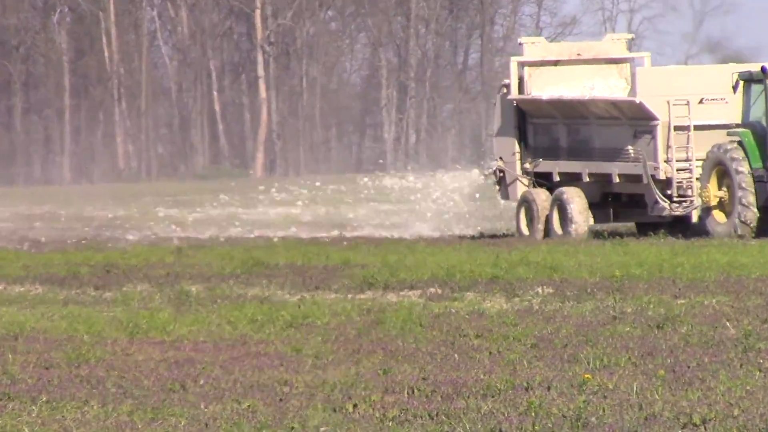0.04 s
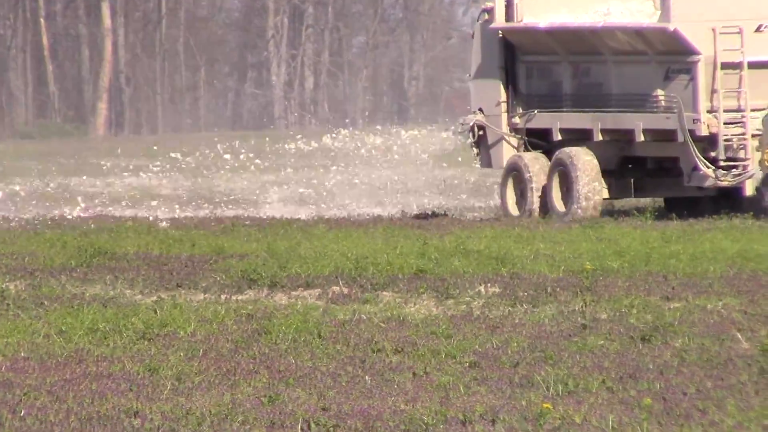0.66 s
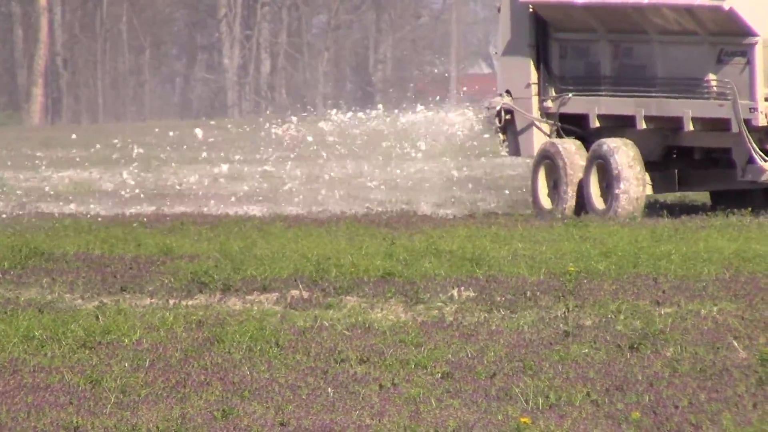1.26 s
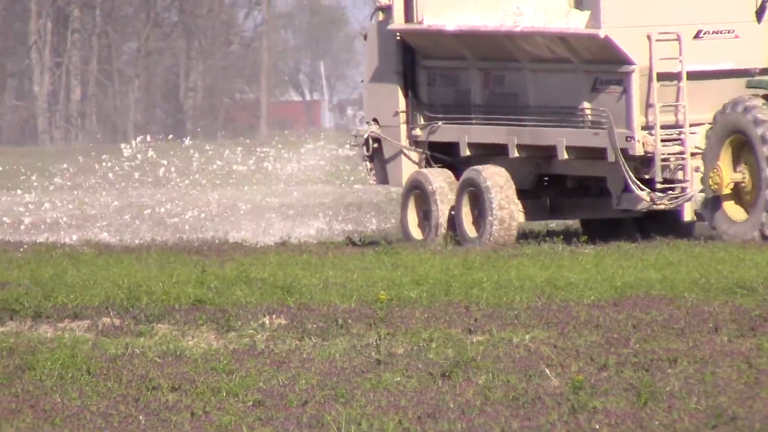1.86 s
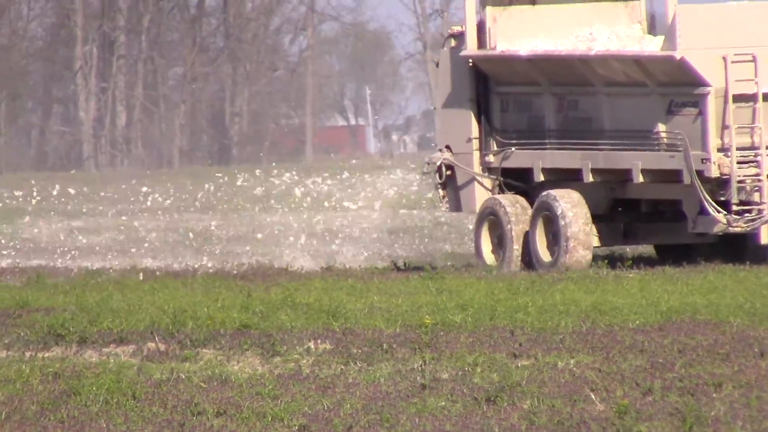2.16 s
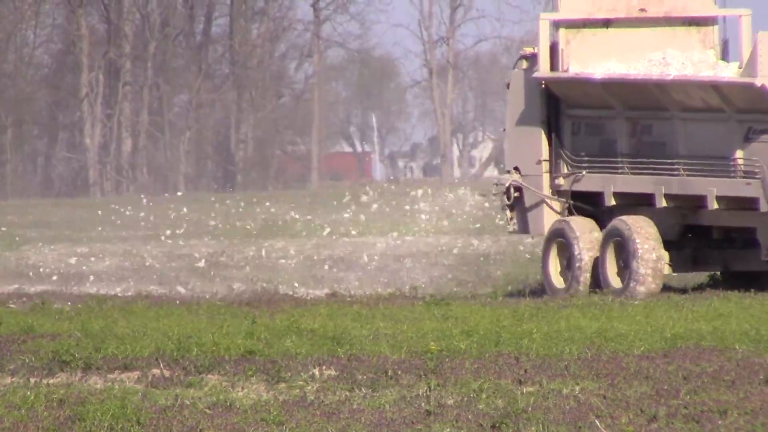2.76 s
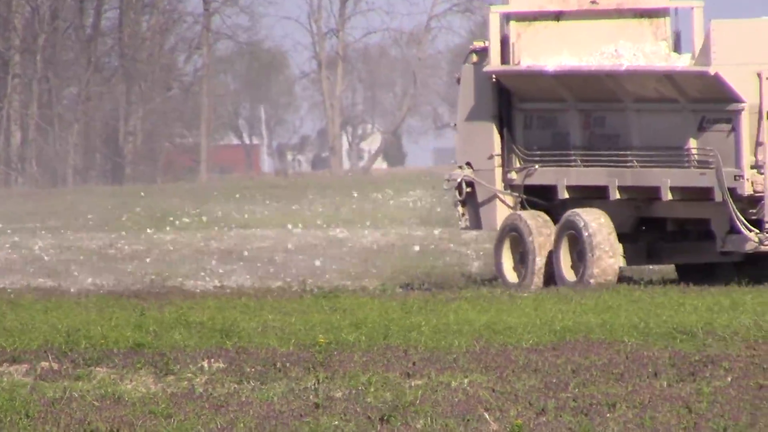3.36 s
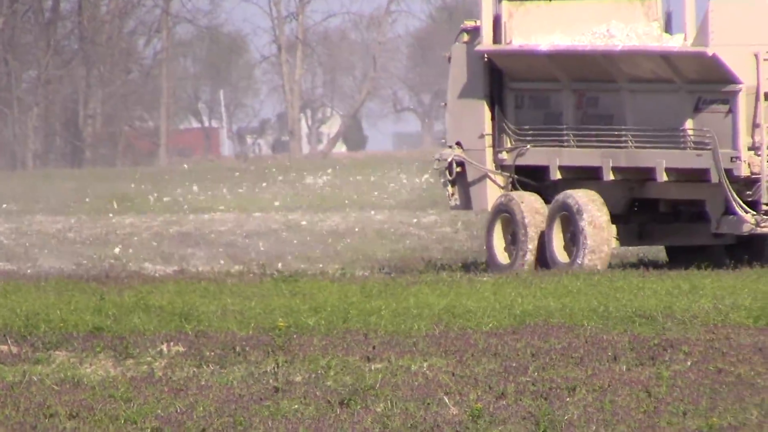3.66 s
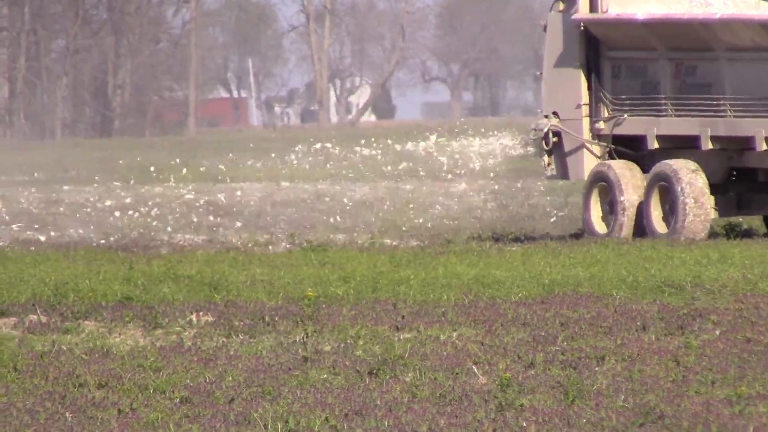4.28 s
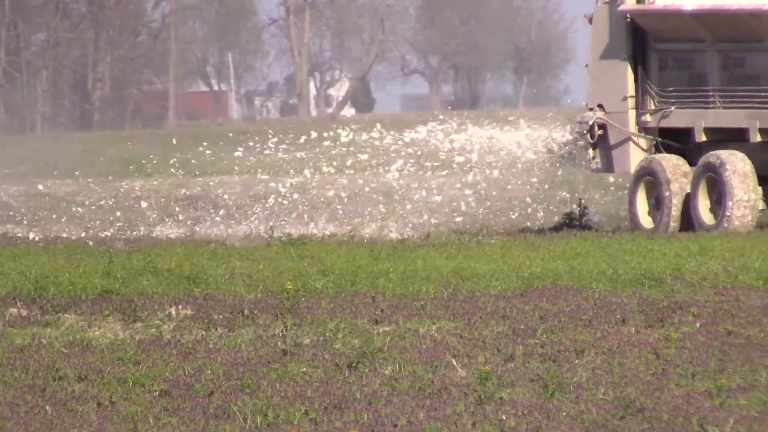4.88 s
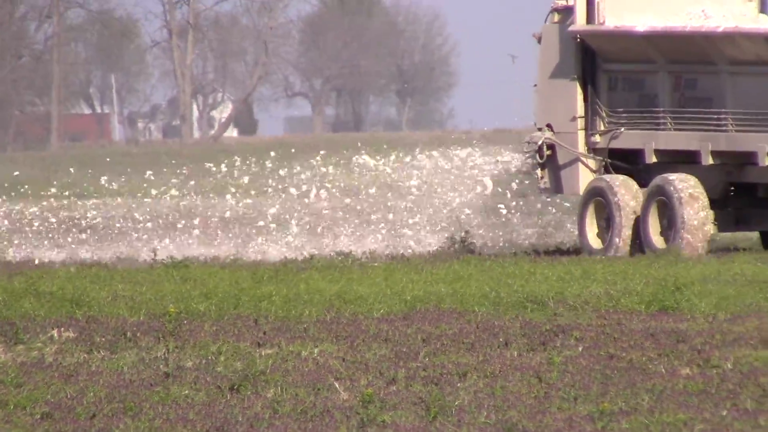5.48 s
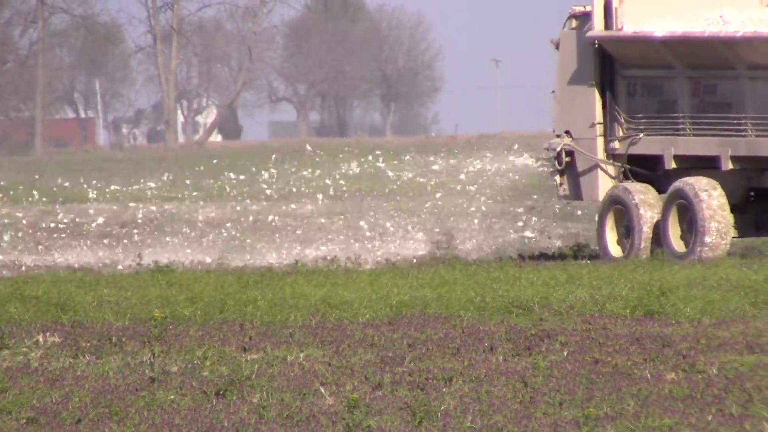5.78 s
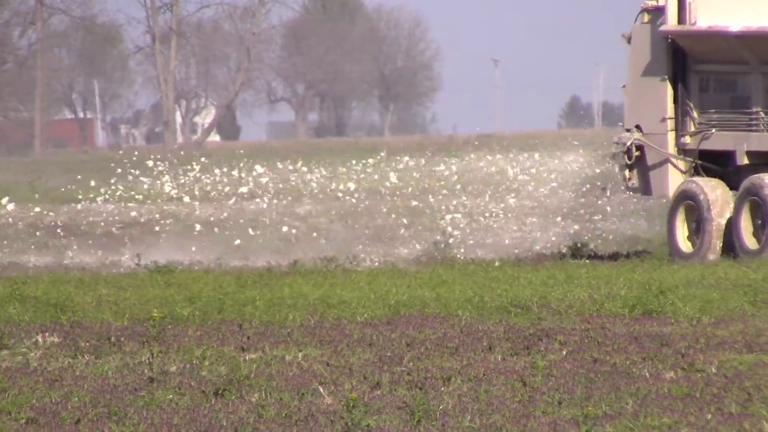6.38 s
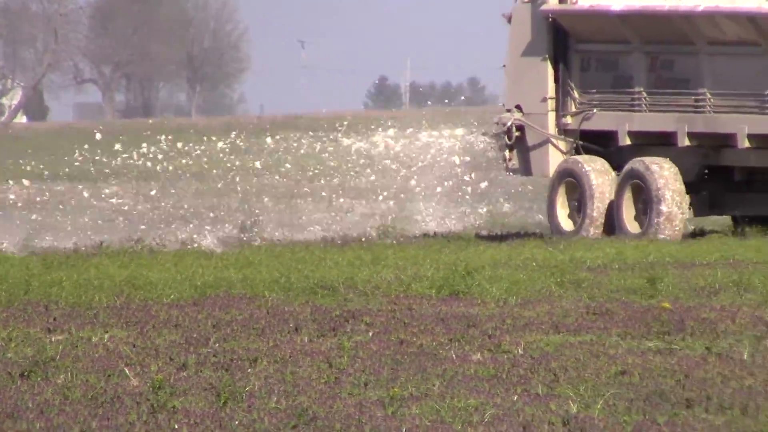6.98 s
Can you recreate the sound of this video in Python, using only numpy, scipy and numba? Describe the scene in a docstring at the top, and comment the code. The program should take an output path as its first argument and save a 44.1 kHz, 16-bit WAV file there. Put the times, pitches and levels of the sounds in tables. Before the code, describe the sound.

Gusty wind thumps against the microphone over the steady hum and rattle of a tractor pulling a working spreader across a field.

```python
"""Manure spreading in gusty wind

A six-cylinder diesel tractor pulls a working manure spreader across an open field, some way off.
Periodic firing makes the exhaust hum and the engine clatter; the beaters fling a hissing spray and clods.
Turbulent pressure buffets the two ports of a microphone; late on, its wind filter thins the bass
and narrows all but the high treble to mono."""
import sys
import numpy as np
from scipy import signal
from scipy.fft import rfft, irfft, next_fast_len
from scipy.io import wavfile
from scipy.ndimage import uniform_filter1d, minimum_filter1d, map_coordinates
from numba import njit

SR = 44100
rng = np.random.default_rng(int(sys.argv[2]) if len(sys.argv) > 2 else 0)


def store_wav(level_fs):
    """Save 16-bit WAV to argv[1]."""
    pcm = np.round(np.clip(np.atleast_2d(level_fs), -1, 1) * 32767)
    wavfile.write(sys.argv[1], SR, pcm.T.astype(np.int16))


N = 314874
T = np.arange(N) / SR
CLOSING_PER_S = .11  # relative rate at which echo lags shrink and clatter bands and notches rise


def undb(db):
    """Logarithmic level: 20 dB is a factor of ten in amplitude."""
    return 10 ** (np.asarray(db) / 20)


def curves(table):
    """Linear interpolation: each column after the time becomes a value per sample."""
    times, *columns = np.transpose(table)
    return [np.interp(T, times, column) for column in columns]


def unit(x):
    """Normalisation to an rms of 1."""
    return x / np.sqrt(np.mean(x ** 2))


def filtered(x, response):
    """Linear filtering: the spectrum is multiplied by a frequency response."""
    size = next_fast_len(x.shape[-1])
    hz = np.maximum(np.fft.rfftfreq(size, 1 / SR), 1)
    return irfft(rfft(x, size) * response(hz), size)[..., :x.shape[-1]]


def colour(x, spectrum):
    """Spectral shaping by (frequency [Hz], relative level [dB]) points, to an rms of 1."""
    hz, db = np.transpose(spectrum)
    return unit(filtered(x, lambda f: undb(np.interp(np.log(f), np.log(hz), db))))


def noise():
    """White noise: equal mean power per hertz."""
    return rng.standard_normal(N)


def wander(rate_hz, size=N):
    """Low-passed noise: a smooth random fluctuation with an rms of 1."""
    return unit(filtered(rng.standard_normal(size), lambda f: np.exp(-(f / rate_hz) ** 2)))


def spread(mid, side, side_db):
    """Mid-side stereo: the side signal adds on the left and subtracts on the right."""
    return mid + undb(side_db) * side * np.array([[1], [-1]])


def scattered_times(start, length, per_s):
    """Stratified sampling: one random moment in each of a row of equal slots."""
    slots = max(round(length * per_s), 1)
    return start + length * (np.arange(slots) + rng.random(200)[:slots]) / slots


@njit
def band_pass(x, hz, width_hz):
    """Second-order band-pass filter with a moving centre."""
    out, band_state, low_state = np.empty(len(x)), 0., 0.
    for i in range(len(x)):
        tuning, damping = np.tan(np.pi * hz[i] / SR), width_hz / hz[i]
        band = (band_state + tuning * (x[i] - low_state)) / (1 + tuning * (tuning + damping))
        band_state = 2 * band - band_state
        low_state += 2 * tuning * band
        out[i] = damping * band
    return out


def bursts(rows, octaves, decay_s):
    """Exponential decay of noise bands, one per (time [s], level [dB], centre [Hz]) row."""
    out = 0
    for s, db, hz in rows:
        band = unit(filtered(noise(), lambda f: np.exp(-(np.log2(f / hz) / octaves) ** 2 / 2)))
        out = out + band * undb(db) * (T >= s) * np.exp(-np.abs(T - s) / decay_s)
    return out


def turbulence(hz, corner_hz, slope=3.14, low_hz=125, top_hz=2100):
    """Power-law spectrum: eddy pressure falls above a corner, and the microphone rolls off the bass."""
    eddy_loss = (1 + (hz / corner_hz) ** (2 * slope)) * (1 + (hz / top_hz) ** 8)
    bass_loss = 1 + (low_hz / hz) ** 4.06
    return 1 / np.sqrt(eddy_loss * bass_loss)


# Breeze between the gusts: (time [s], relative level [dB])
BREEZE_LEVEL = [(0, -38.5), (0.95, -37), (1.1, -54), (1.4, -79), (2.3, -90), (3.0, -66), (3.45, -39.5),
                (3.7, -58.5), (4.15, -36), (4.65, -46), (5.35, -35.5), (5.85, -53), (7.14, -54.5)]
def breeze(corner_hz=203, flutter_db=3):
    """Weak turbulence: light air keeps the pressure fluttering at the ports."""
    eddies = spread(noise(), noise(), side_db=-6) * undb(flutter_db * wander(34))
    pressure = unit(filtered(eddies, lambda f: turbulence(f, corner_hz, slope=3.22)))
    return pressure * undb(curves(BREEZE_LEVEL)[0] + 6)


def puffs(per_s=6.4, length_s=.005, corner_hz=269, scatter_db=2.5, bias_db=11):
    """Advection: small eddies ride on the breeze and strike either port; gives rows for buffets()."""
    times = scattered_times(0, T[-1], per_s)
    levels_db = np.interp(times, *np.transpose(BREEZE_LEVEL)) + 6
    return [(s, length_s, db + scatter_db * strength, corner_hz, bias_db * np.sign(port))
            for s, db, (strength, port) in zip(times, levels_db, rng.standard_normal((200, 2)))]


# Strong gusts: (time [s], length [s], level [dB], turbulence corner [Hz], nominal left bias [dB])
WIND_GUSTS = [(0.088, 0.024, -25.5, 242, -14), (0.242, 0.012, -21, 254, 15),
              (0.581, 0.027, -16.5, 326, -9.5), (0.8, 0.037, -24, 312, 14), (0.902, 0.044, -29, 380, 13),
              (1.205, 0.085, -33.5, 261, -9), (1.27, 0.025, -28.5, 400, 6), (1.518, 0.041, -44.5, 215, -4),
              (2.541, 0.03, -31, 296, 5), (2.573, 0.039, -26.5, 263, 5), (2.675, 0.023, -39.5, 237, -8),
              (3.02, 0.035, -41.5, 255, 5), (3.199, 0.0081, -29, 235, 8), (3.376, 0.026, -27, 274, -9),
              (3.441, 0.037, -26, 267, -7.5), (3.486, 0.012, -20.5, 308, 19),
              (3.816, 0.012, -21, 280, -10.5), (4.124, 0.064, -19, 305, 9.5),
              (4.216, 0.011, -16.5, 337, -11), (4.285, 0.014, -23.5, 340, 16.5),
              (4.44, 0.064, -29.5, 250, 10), (4.55, 0.022, -19, 273, -9), (4.731, 0.013, -25.5, 271, -12.5),
              (4.816, 0.03, -20, 274, -10), (4.921, 0.087, -10.5, 469, 10.5),
              (5.087, 0.017, -31.5, 236, -7), (5.152, 0.11, -8, 473, 10.5), (5.302, 0.035, -15, 398, 12.5),
              (5.468, 0.022, -6.5, 456, 7), (5.511, 0.059, -7.5, 524, 10), (5.661, 0.012, -29, 330, 10),
              (5.925, 0.026, -20.5, 420, 13.5), (5.943, 0.082, -24.5, 454, 12.5),
              (6.191, 0.014, -31, 473, 8.5), (6.234, 0.01, -34.5, 364, -6), (6.459, 0.043, -31, 385, -12),
              (7.056, 0.009, -39, 382.5, -10)]
def buffets(gusts, rise_s=.0037, fall_s=.013, sag_s=.085, flap_db=1.7, lee_hz=470, size=16384):
    """Wind shadowing: a gust hits one port first; the port in its lee receives it later and duller."""
    out = np.zeros((2, N + 2 * size))
    lead = size // 8
    t = (np.arange(size) - lead) / SR
    for s, length, db, corner_hz, bias_db in gusts:
        envelope = np.exp(np.minimum(t, 0) / rise_s - np.maximum(t - length, 0) / fall_s)
        sag_db = 4 * (np.clip(t, 0, length) / sag_s) ** 2
        envelope *= undb(flap_db * wander(55, size) - sag_db)
        shared, *own = rng.standard_normal((3, size)) * envelope
        windward = shared + .22 * own[0]
        lee = filtered(shared + .22 * own[1], lambda f: (1 + 1j * f / lee_hz) ** (-abs(bias_db) / 5))
        ports = np.array([windward, lee])
        spurts = unit(undb(6 * wander(130, size)))  # the smallest eddies are intermittent
        large_eddies = filtered(ports, lambda f: 1 / (1 + (f / 600) ** 4))
        eddies = large_eddies + spurts * (ports - large_eddies)
        low_hz = max(.35 * corner_hz, 125)  # faster air, less boom
        pressure = unit(filtered(eddies, lambda f: turbulence(f, corner_hz, low_hz=low_hz)))
        pressure *= np.sqrt(np.mean(envelope ** 2)) * undb(db)
        start = int(s * SR)
        out[:, start:start + size] += pressure if bias_db >= 0 else pressure[::-1]
    return out[:, lead:lead + N]


def cracks(per_s=60, hz=700, scatter_db=4, bias_db=6.5):
    """Pressure steps snap at the windward port, harder in stronger gusts; gives rows for pops()."""
    rows = []
    for gust_s, length, gust_db, _, side in WIND_GUSTS:
        span = .7 * length
        times = scattered_times(gust_s, span, per_s)[:round(span * per_s)]
        for s, chance in zip(times, rng.standard_normal(20)):
            rows.append((s, 1.8 * gust_db - 1 + scatter_db * chance, hz, bias_db * np.sign(side)))
    return rows


# The hardest single eddies: (time [s], peak level [dB], pitch [Hz], left minus right [dB])
EDDY_POPS = [(0.25, -9, 266, 15), (0.59, -16.5, 356, 6), (0.647, -16, 245, 18), (0.827, -12, 269.5, 12),
             (0.909, -23, 480, 9), (0.925, -10, 330, 8), (0.94, -14.5, 420, 12), (1.274, -20, 416, 1.5),
             (3.44, -18, 253, 17), (3.489, -20, 323, 0), (3.789, -6, 252, 11), (4.129, -14.5, 267.4, -13),
             (4.179, -10, 306, 12), (4.22, -15.5, 406, -11), (4.293, -16.5, 292, 1.5),
             (4.559, -19.5, 324, 1), (4.83, -15.5, 326, -12), (4.941, -8, 910, 23),
             (4.966, -4.5, 657, 23.5), (5.151, -1.5, 407, 19), (5.164, -1, 890, 20),
             (5.177, -5.5, 798, 15.5), (5.202, -6, 540, 12), (5.223, -9, 780, 22), (5.236, -6, 760, 20),
             (5.305, -5, 406, 8), (5.476, -5, 684, 15), (5.511, 0, 960, 25), (5.544, 4.5, 776, 23),
             (5.737, -17.5, 327, 7.5), (5.922, -17, 410, -4), (5.949, -22.5, 646, 0), (5.987, -34, 473, 13),
             (6.196, -25, 534, 1), (6.3, -22, 287, -5), (6.443, -30, 450, -12), (6.845, -38.5, 418.7, -1)]
def pops(rows, octaves=.726, top_hz=1550, size=2048):
    """Impulse response: a sudden pressure step at the ports gives one short band-limited pop."""
    out = np.zeros((2, N + size))
    for s, db, hz, bias_db in rows:
        edges_hz = np.minimum(hz * 2 ** (octaves * np.array([-1, 1])), top_hz)
        pop_filter = signal.butter(4, edges_hz, "band", fs=SR, output="sos")
        pop = signal.sosfilt(pop_filter, signal.unit_impulse(size))
        ports_db = db + np.minimum([bias_db, -bias_db], 0)
        start = max(int(s * SR) - np.abs(pop).argmax(), 0)
        out[:, start:start + size] += np.outer(undb(ports_db), pop / np.abs(pop).max())
    return out[:, :N]


def overload(wind, full_travel=1.1, low_hz=55, muffle_hz=2700):
    """Saturation: strong eddies drive the capsules to the end of their travel, rounding the peaks."""
    rounded = full_travel * np.tanh(wind / full_travel)
    return filtered(rounded, lambda f: 1 / np.sqrt((1 + (f / muffle_hz) ** 8) * (1 + (low_hz / f) ** 4)))


# Small ticks close by: (time [s], level [dB], pitch [Hz])
NEAR_TICKS = [(3.062, -42.5, 5400), (3.066, -36, 2300), (6.67, -45, 8800)]
def ticks():
    """Transients: noise that decays within milliseconds is heard as a sharp tick."""
    return bursts(NEAR_TICKS, octaves=.42, decay_s=.0016)


# High whine of the drive line: (time [s], level [dB])
WHINE_LEVEL = [(0, -78), (.5, -83), (1.3, -86), (2.0, -80), (2.45, -73), (3.0, -92), (4.1, -78), (5.0, -76),
               (5.7, -77.5), (7.14, -80)]
def whine(hz, db):
    """Amplitude and frequency modulation: a thin drive-line tone swells, fades and wavers."""
    return undb(db + 2 * wander(4)) * np.sin(2 * np.pi * np.cumsum(hz + 3 * wander(10)) / SR)


# Clods knocked off the beaters: (time [s], level [dB])
CLOD_HITS = [(1.451, -48), (1.612, -47), (1.639, -48), (1.771, -47), (1.94, -46)]
# Modes of the struck steel: (frequency [Hz], relative level [dB])
STEEL_MODES = [(925, -8), (1060, 1.5), (1300, -5)]
def clods():
    """Impact excitation: each clod smacks against steel, whose modes ring briefly."""
    smack = bursts([(s, db, 1400) for s, db in CLOD_HITS], octaves=.81, decay_s=.02)
    modes = [(s, db + mode_db - 8, hz) for s, db in CLOD_HITS for hz, mode_db in STEEL_MODES]
    return smack + bursts(modes, octaves=.03, decay_s=.032)


# Spectrum of the spray: (frequency [Hz], relative level [dB])
SPRAY_SPECTRUM = [(1500, -11), (4000, 9.5), (5600, 7), (6800, 3), (8500, 0), (11500, -4), (15500, -9.5)]
# Hiss of the spray: (time [s], relative level [dB])
SPRAY_LEVEL = [(0, -69.5), (.27, -72), (.36, -76), (1.3, -78.5), (1.65, -73), (2.58, -73), (2.7, -75),
               (2.95, -73), (7.14, -71.5)]
def spray():
    """Broadband noise: the spray off the beaters hisses, partly coherent between the ports."""
    hiss = spread(colour(noise(), SPRAY_SPECTRUM), colour(noise(), SPRAY_SPECTRUM), side_db=-12.5)
    return hiss * undb(curves(SPRAY_LEVEL)[0] + 6.5)


# Spectrum of the spreader's body: (frequency [Hz], relative level [dB])
BODY_SPECTRUM = [(25, 1), (300, 3.5), (600, 3), (800, -1), (1000, 2.5), (1400, -2), (1900, -2), (2400, -4),
                 (3500, -24.5), (8000, -56.5)]
# Roar of the body: (time [s], relative level [dB])
BODY_LEVEL = [(0, -44), (.2, -49.5), (.85, -61.5), (1.9, -52.5), (2.65, -53.5), (2.9, -50.5), (5.7, -48.5),
              (6.5, -54), (7.14, -53.5)]
def body_roar(envelope, gain_db):
    """Random vibration: the spreader's body roars over a broad band."""
    return colour(noise() * envelope, BODY_SPECTRUM) * undb(curves(BODY_LEVEL)[0] + gain_db)


# Reflections off the rig's steel panels: (initial lag [s], relative gain [1])
PANEL_PATHS = [(.0016, .28), (.0025, .34), (.0037, .34), (.0056, .3), (.009, .26)]
def panel_echoes(x):
    """Comb filtering: close echoes come and go as the panels turn, and their ridges creep upward."""
    out = x
    for lag_s, gain in PANEL_PATHS:
        lag = lag_s * np.exp(-CLOSING_PER_S * T + .015 * wander(1.5))
        echo = map_coordinates(x, [(T - lag) * SR], order=2)
        out = out + gain * np.tanh(2 * wander(1.1)) * echo
    return out / np.sqrt(1 + sum(gain ** 2 for _, gain in PANEL_PATHS) / 2)


def restless_air(x, depth_db=1, fades_per_s=7, bands=14):
    """Scintillation: moving air over the field makes bands swell and fade independently."""
    centres_hz, out = np.linspace(600, 6000, bands), 0
    knots_s = np.arange(0, T[-1] + 1, 1 / fades_per_s)
    for weights, fades in zip(np.eye(bands), rng.standard_normal((bands, 400))):
        band = filtered(x, lambda f: np.interp(f, centres_hz, weights))
        out = out + band * undb(depth_db * np.interp(T, knots_s, fades[:len(knots_s)]))
    return out


# Bands cancelled by the ground echo: (time [s], half length [s], centre [Hz], width [Hz], depth [0-1])
GROUND_NOTCHES = [(0.353, 0.3, 3150, 460, 0.7), (2.277, 0.15, 3300, 350, 1), (2.747, 0.069, 2750, 500, 0.1),
                  (4.455, 0.3, 3310, 380, 0.3), (4.505, .35, 2040, 296, 0.4), (6.101, 0.79, 2110, 377, .55),
                  (6.502, .18, 3150, 380, 0.45)]
def ground_echo(x):
    """Destructive interference: the ground echo cuts passing notches that rise as the rig moves."""
    out = x.copy()
    for s, half_s, hz, width_hz, depth in GROUND_NOTCHES:
        near = np.abs(T - s) < 3 * half_s
        t = T[near] - s
        band = band_pass(x[near], hz * np.exp(CLOSING_PER_S * t), float(width_hz))
        out[near] -= depth * np.exp(-(t / half_s) ** 2 / 2) * band
    return out


# Narrow bands of the clatter: (time [s], half length [s], centre [Hz], relative level [dB])
CLATTER_BANDS = [(.08, 0.13, 2750, -55.5), (.194, 0.31, 1890, -54), (.25, 0.14, 3970, -65),
                 (.81, .08, 2790, -57), (.847, 0.2, 2245, -57.5), (1.25, 0.22, 2440, -60),
                 (1.83, .1, 3320, -61), (1.873, .15, 2600, -57.5), (2.181, 0.061, 2730, -59.5),
                 (2.08, .1, 4076, -61.5), (2.454, .095, 3550, -61), (2.52, .17, 2370, -59),
                 (2.852, 0.15, 1047, -59.5), (3.0, .12, 2190, -64), (3.2, .15, 4880, -73),
                 (3.38, .1, 3930, -71), (3.4, 0.13, 2620, -59.5), (3.79, 0.2, 1830, -58.5),
                 (4.27, 0.13, 2500, -68), (4.277, .1, 3650, -60.5), (4.658, 0.1, 2580, -56),
                 (4.68, 0.082, 3710, -68), (5.03, 0.085, 2820, -53.5), (5.385, 0.069, 2710, -48),
                 (5.39, 0.085, 4100, -57.5), (5.72, 0.23, 2990, -56.5), (5.72, 0.13, 5100, -72),
                 (5.866, 0.11, 3300, -54.5), (6.098, 0.22, 2391, -56.5), (6.112, 0.066, 3980, -61),
                 (6.144, .08, 3360, -58.5), (6.462, 0.15, 3890, -57), (6.6, .15, 5050, -65),
                 (6.85, 0.32, 2505, -50), (6.85, 0.3, 4470, -57), (6.98, .12, 4930, -59.5)]
def clatter_bands(knock, relative_width=.066):
    """Band-pass filtering: narrow bands of the clatter swell, waver, creep upward and fade."""
    out, drive = np.zeros(N), noise() * knock
    waver = .012 * wander(16)
    for s, half_s, hz, db in CLATTER_BANDS:
        width_hz = relative_width * hz
        near = np.abs(T - s) < 2.5 * half_s
        t = T[near] - s
        centre_hz = hz * np.exp(CLOSING_PER_S * t + waver[near])
        band = band_pass(band_pass(drive[near], centre_hz, width_hz), centre_hz, 2 * width_hz)
        out[near] += unit(band) * np.exp(-(t / half_s) ** 2 / 2) * undb(db + 1.5)
    return out


# Engine speed, sagging and recovering under the beaters' load: (time [s], firing rate [Hz])
FIRING_RATE = [(0, 98.1), (.4, 98.4), (1.2, 96), (2.6, 96.97), (2.9, 99.86), (3.85, 98.43), (4.4, 97.8),
               (4.68, 97.85), (4.9, 95.1), (5.55, 95), (6.15, 95.35), (6.48, 99.14), (6.72, 97.1),
               (7.14, 97.3)]
def firing_count():
    """Phase is the integral of frequency: the number of firings so far."""
    return np.cumsum(curves(FIRING_RATE)[0]) / SR


def firing_pulses(firings, decay_periods, cylinder_db, scatter_db=1.8):
    """Cyclic variation: each firing gives a pulse; the six cylinders differ and no two turns are alike."""
    index = firings.astype(int)
    pulse_db = np.take(cylinder_db, index, mode="wrap") + scatter_db * rng.standard_normal(1000)[index]
    return unit(undb(pulse_db) * np.exp(-(firings % 1) / decay_periods))


# Blurring of the knocks: (time [s], steady part relative to the pulses' rms [1])
KNOCK_BLUR = [(0, 0.42), (6.3, 0.4), (6.7, 0.15)]
def knock_envelope(firings):
    """Screening: the spreader hides the engine and blurs its knocks, here at constant power."""
    pulses = firing_pulses(firings, decay_periods=.45, cylinder_db=[7.5, 4, 6, 3, 2.5, 4.6])
    blurred = pulses + curves(KNOCK_BLUR)[0]
    return blurred / np.sqrt(uniform_filter1d(blurred ** 2, SR // 8))


# Spectrum of the diesel clatter: (frequency [Hz], relative level [dB])
CLATTER_SPECTRUM = [(900, -17), (1600, -3), (2000, -4), (2400, -2), (2800, -1), (3150, -3), (3800, -12),
                    (5000, -19), (7000, -41.5), (14000, -50)]
# Spectrum of its sharp edge: (frequency [Hz], relative level [dB])
EDGE_SPECTRUM = [(2000, -36), (3100, -5.5), (3600, 0), (4200, -4), (4900, -13.5), (6000, -15.5),
                 (8000, -24.5), (14000, -52.5)]
# Diesel knock: (time [s], relative clatter level [dB], relative edge level [dB])
KNOCK_LEVELS = [(0.0, -51.5, -73), (0.27, -51.5, -65), (0.4, -52, -64), (1.2, -56, -67), (1.9, -51, -59),
                (2.55, -51.5, -59.5), (2.72, -54, -64), (3.55, -53, -54), (3.9, -53.5, -61.5),
                (4.8, -56.5, -58.5), (5.4, -51.5, -54.5), (6.3, -49.5, -54.5), (6.8, -48.5, -51),
                (7.14, -49, -54)]
def machinery(knock, air_hz=7000):
    """Multipath propagation: engine clatter and the spreader's roar arrive both direct and scattered."""
    clatter_db, edge_db = curves(KNOCK_LEVELS)
    clatter = colour(noise() * knock, CLATTER_SPECTRUM) * undb(clatter_db - 1.5)
    edge = colour(noise() * knock, EDGE_SPECTRUM) * undb(edge_db - 4)
    radiated = clatter + edge + body_roar(1 + .21 * knock, gain_db=.5)
    direct = ground_echo(restless_air(panel_echoes(radiated))) + clatter_bands(knock)
    direct = filtered(direct, lambda f: 1 / np.sqrt(1 + (f / air_hz) ** 8))  # distance dulls the knocks
    scattered = colour(noise(), CLATTER_SPECTRUM) * undb(clatter_db - 2) + body_roar(1, gain_db=4.5)
    return spread(direct, scattered, side_db=-19.5)


# Exhaust tones: (multiple of the firing rate [1], relative level [dB])
EXHAUST_ORDERS = [(1, 1), (1.5, -22.5), (2, -4.5), (2.5, -12.5), (3, -17), (3.5, -17), (5.5, -23)]
# Spectrum of the exhaust rumble: (frequency [Hz], relative level [dB])
RUMBLE_SPECTRUM = [(15, -73), (30, -48.5), (60, -29.5), (85, -3.5), (140, 11), (230, 6.5), (350, -1),
                   (550, -16.5), (900, -8), (2000, -55.5)]
# Exhaust hum: (time [s], relative level [dB])
EXHAUST_LEVEL = [(0, -40.5), (1.3, -46), (1.45, -52.5), (1.8, -46), (2.3, -45.5), (3.7, -44), (4.4, -42.5),
                 (5.6, -33), (6.05, -45.5), (7.14, -62)]
def exhaust(firings, waver_db=2.3):
    """Periodic excitation: firing tones sound over a dull rumble that throbs once per engine cycle."""
    tones = sum(undb(db + waver_db * wander(4.6)) * np.sin(2 * np.pi * (order * firings + rng.random()))
                for order, db in EXHAUST_ORDERS)
    throb = firing_pulses(firings, decay_periods=.89, cylinder_db=[-3, -2.5, -10.5, 3.5, 4, 1.5])
    rumble = filtered(colour(noise() * throb, RUMBLE_SPECTRUM), lambda f: 1 / (1 + (f / 2500) ** 4))
    return undb(curves(EXHAUST_LEVEL)[0]) * (undb(1.6) * unit(tones) + undb(-2) * rumble)


def scene():
    """Superposition: the rig out on the field adds to the wind at the microphone."""
    firings = firing_count()
    high_whine = whine(hz=5561, db=curves(WHINE_LEVEL)[0])
    gear_whine = whine(hz=1244, db=-71)
    near_ticks = ticks()
    rig = exhaust(firings) + machinery(knock_envelope(firings)) + spray() + clods()
    wind = breeze() + pops(list(EDDY_POPS) + cracks()) + buffets(list(WIND_GUSTS) + puffs())
    return overload(wind) + near_ticks + high_whine + gear_whine + rig


def record(dry, cut_hz=430, mono_hz=6500, switch_s=5.78, fade_s=.11, ceiling=.94, top_hz=15650):
    """Filtering and limiting: the wind filter fades in, the hardest peaks are held and the top is cut."""
    mid, side = (dry[0] + dry[1]) / 2, (dry[0] - dry[1]) / 2
    thin_mid = filtered(mid, lambda f: 1 / np.sqrt(1 + (cut_hz / f) ** 2))
    treble_side = filtered(side, lambda f: 1 / (1 + (mono_hz / f) ** 4))
    sheltered = spread(thin_mid, treble_side, side_db=7)
    fade = np.clip((T - switch_s) / fade_s + .5, 0, 1)
    mix = dry + fade * (sheltered - dry)
    hold = SR // 50
    needed_gain = ceiling / np.maximum(np.abs(mix).max(axis=0), ceiling)
    gain = uniform_filter1d(minimum_filter1d(needed_gain, hold), hold)
    return signal.sosfilt(signal.ellip(10, .1, 80, top_hz, fs=SR, output="sos"), mix * gain)


dry = scene()
out = record(dry)
store_wav(out)
```